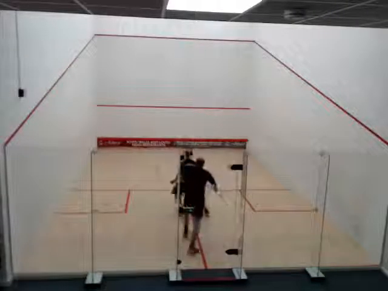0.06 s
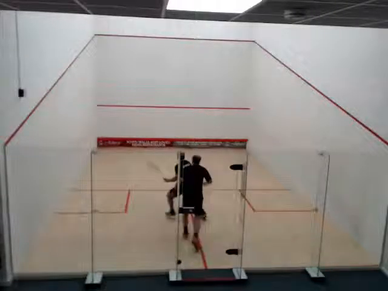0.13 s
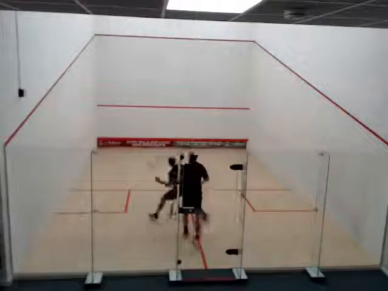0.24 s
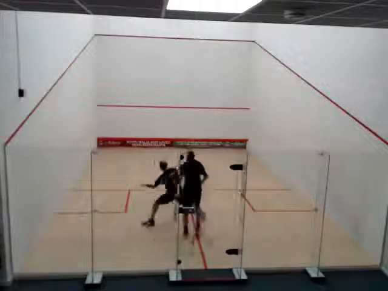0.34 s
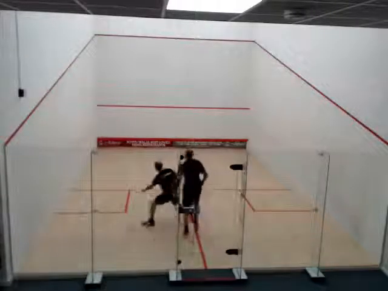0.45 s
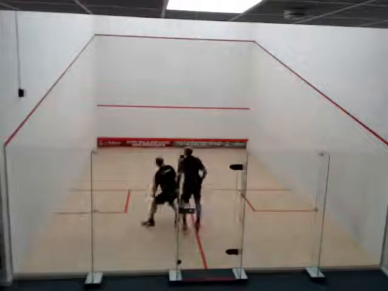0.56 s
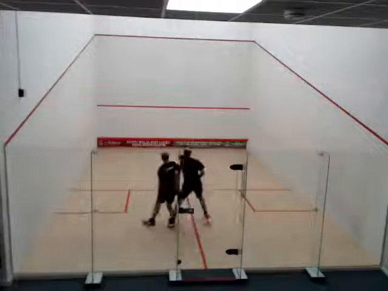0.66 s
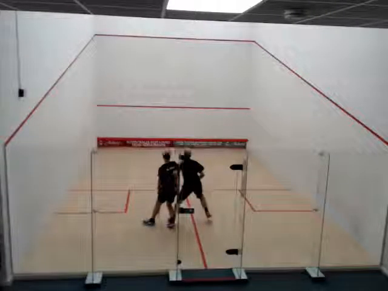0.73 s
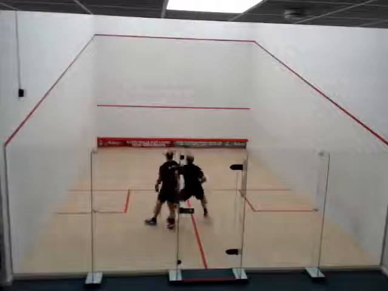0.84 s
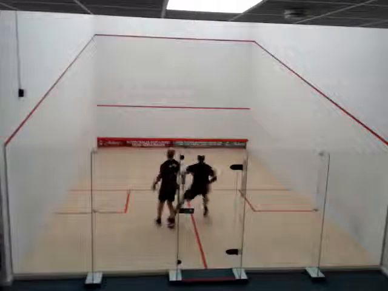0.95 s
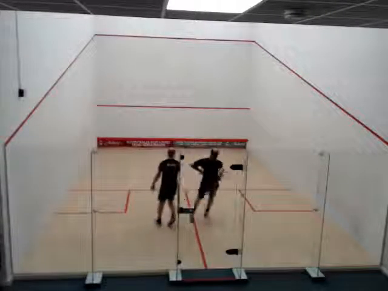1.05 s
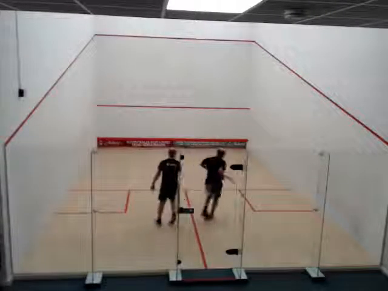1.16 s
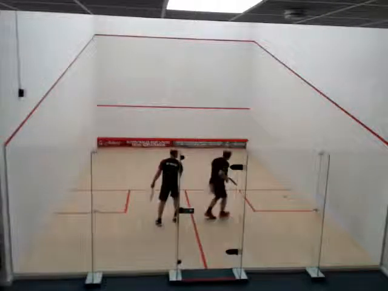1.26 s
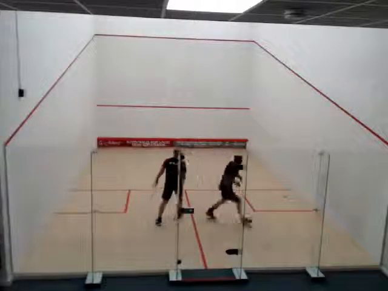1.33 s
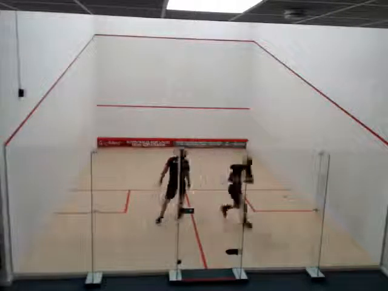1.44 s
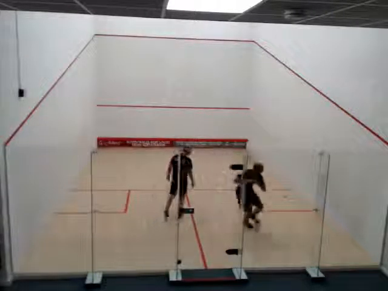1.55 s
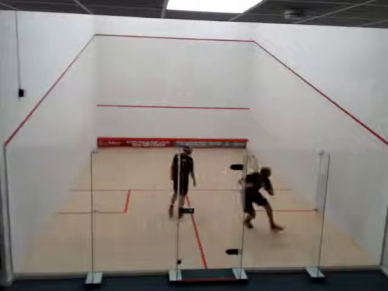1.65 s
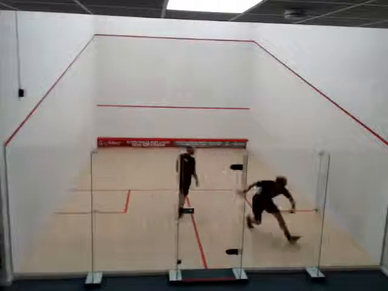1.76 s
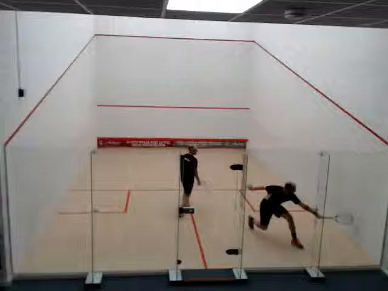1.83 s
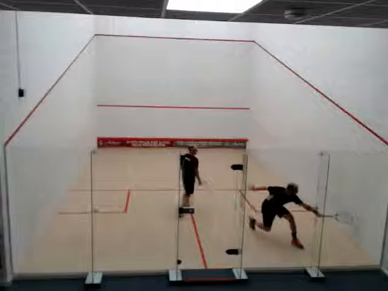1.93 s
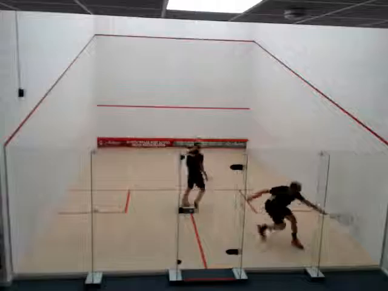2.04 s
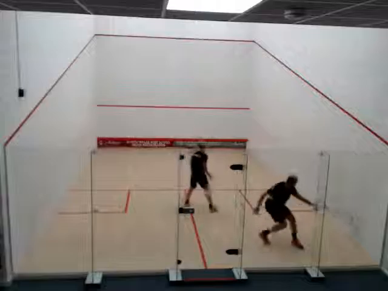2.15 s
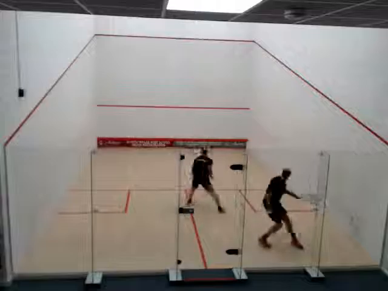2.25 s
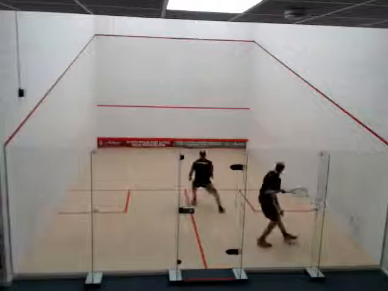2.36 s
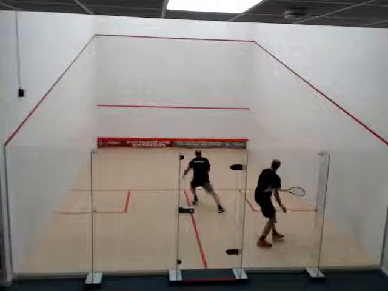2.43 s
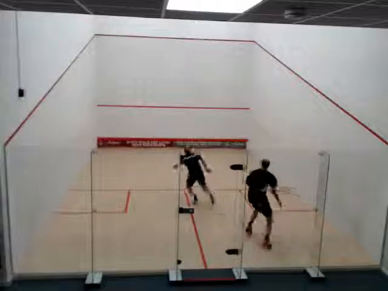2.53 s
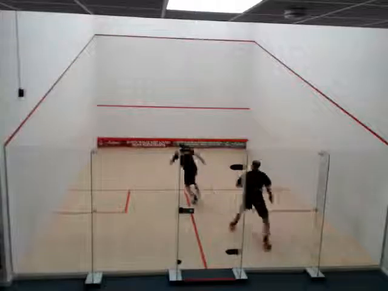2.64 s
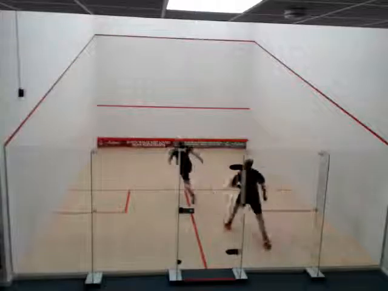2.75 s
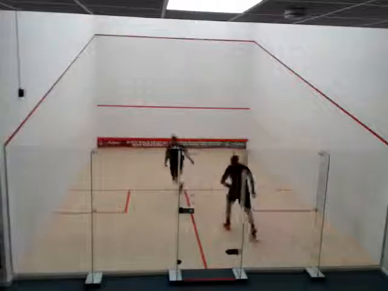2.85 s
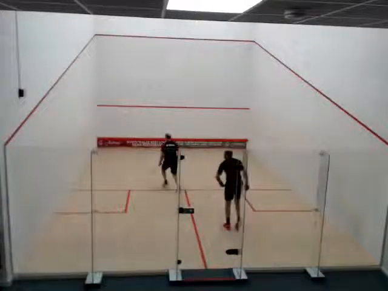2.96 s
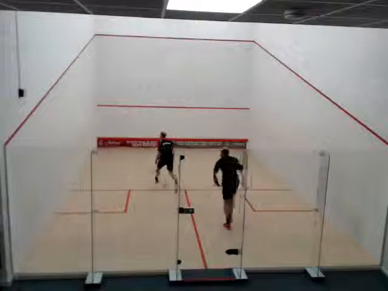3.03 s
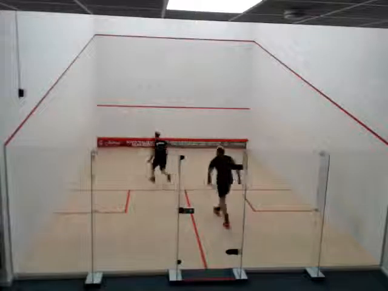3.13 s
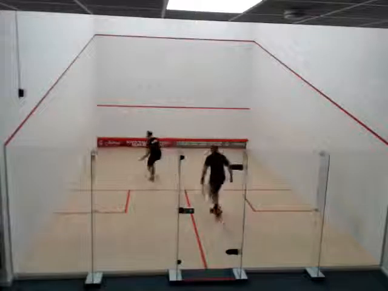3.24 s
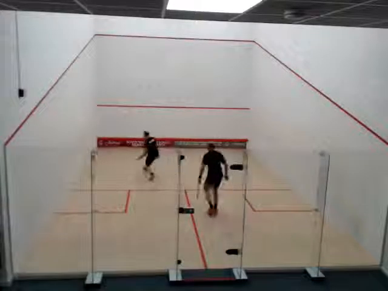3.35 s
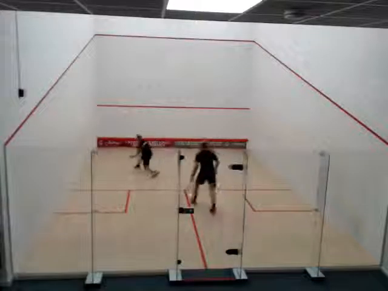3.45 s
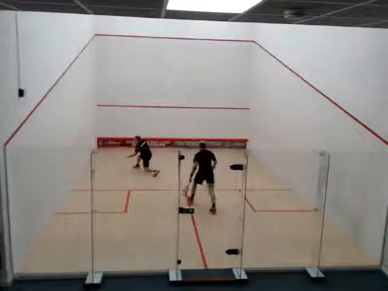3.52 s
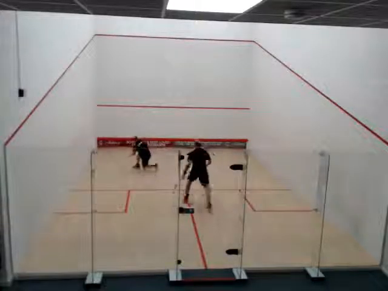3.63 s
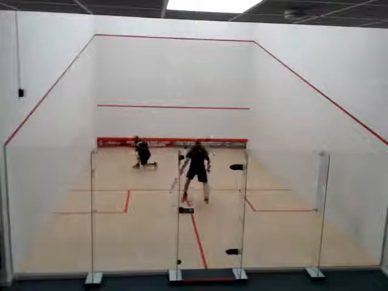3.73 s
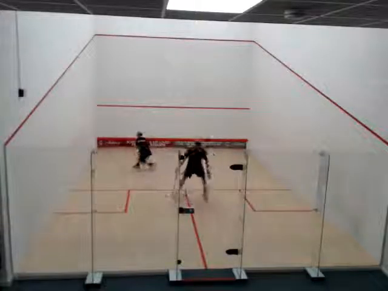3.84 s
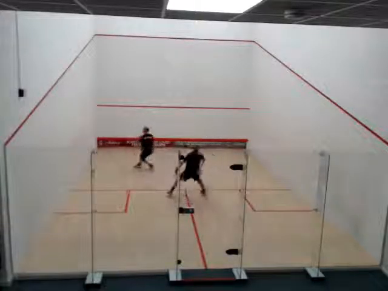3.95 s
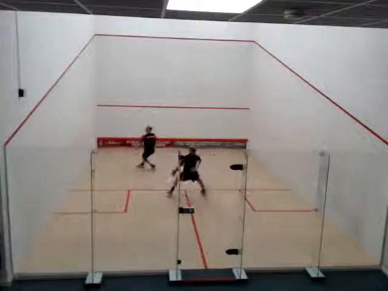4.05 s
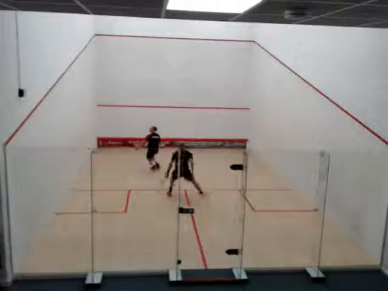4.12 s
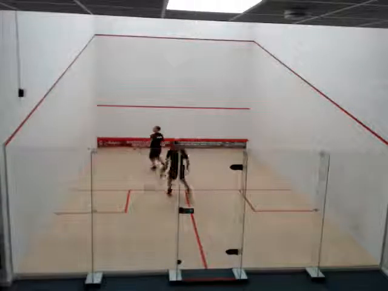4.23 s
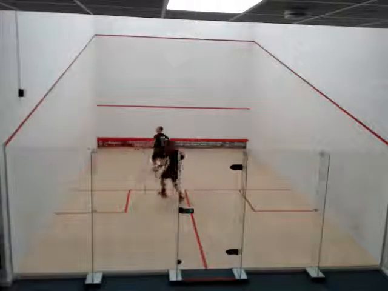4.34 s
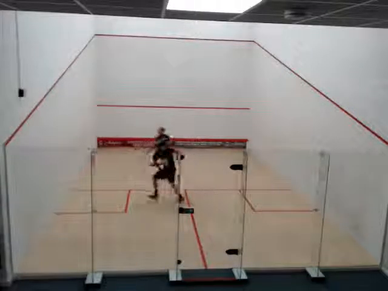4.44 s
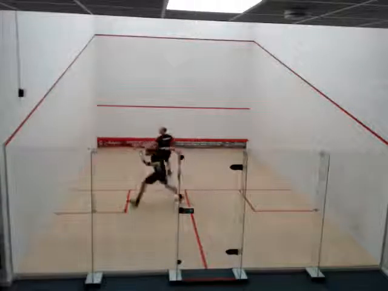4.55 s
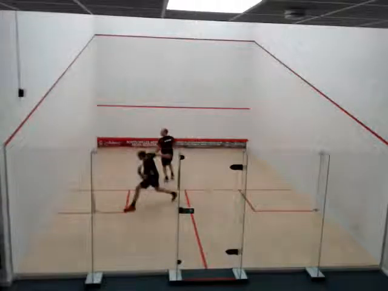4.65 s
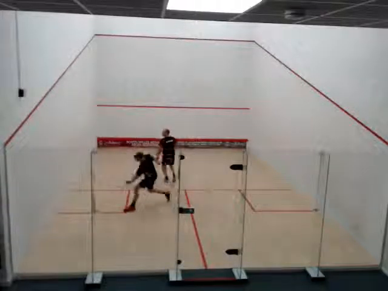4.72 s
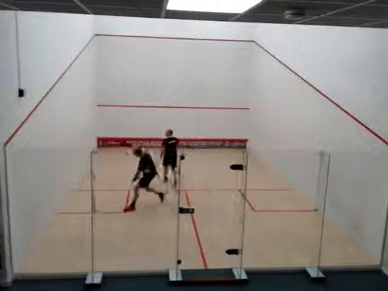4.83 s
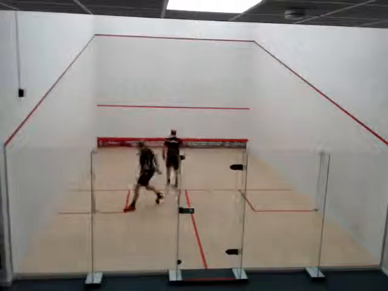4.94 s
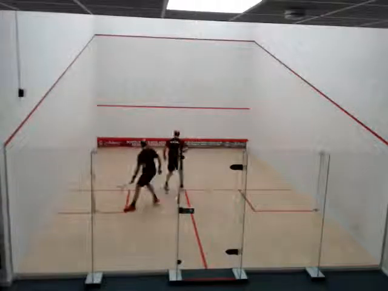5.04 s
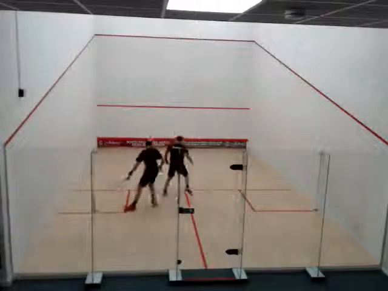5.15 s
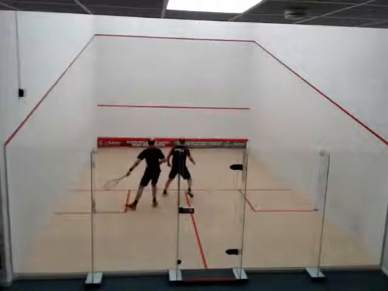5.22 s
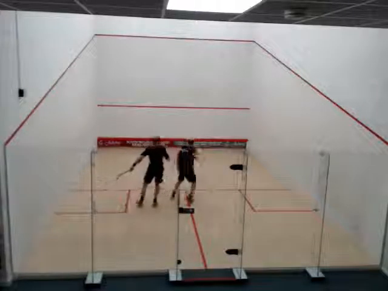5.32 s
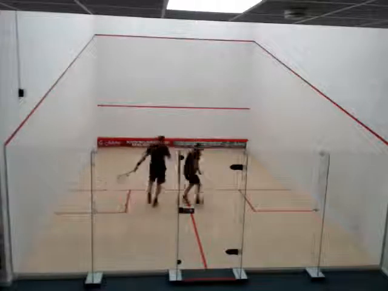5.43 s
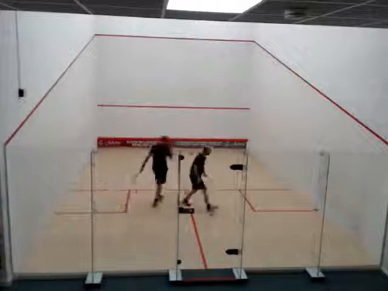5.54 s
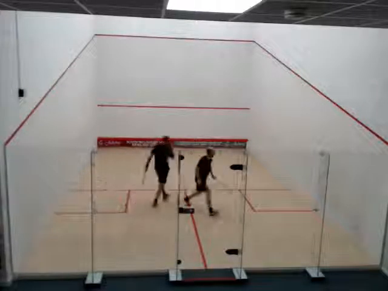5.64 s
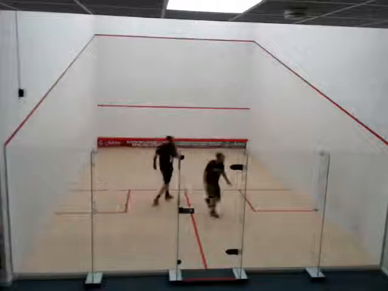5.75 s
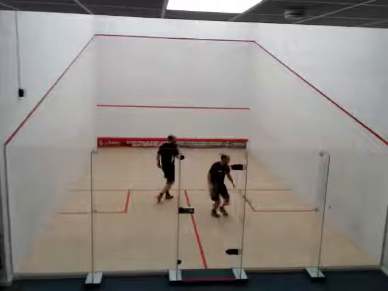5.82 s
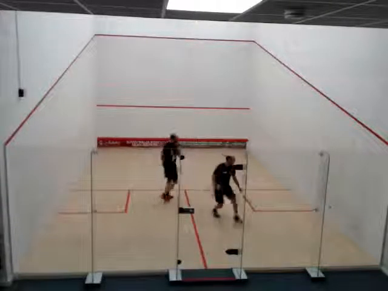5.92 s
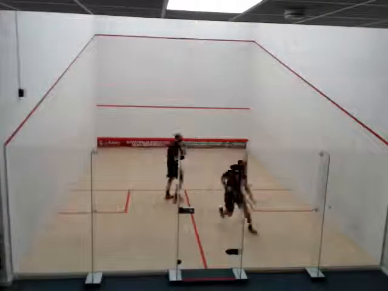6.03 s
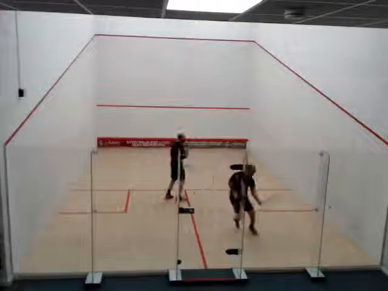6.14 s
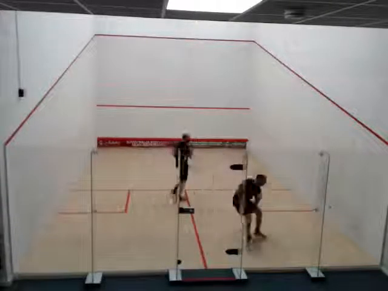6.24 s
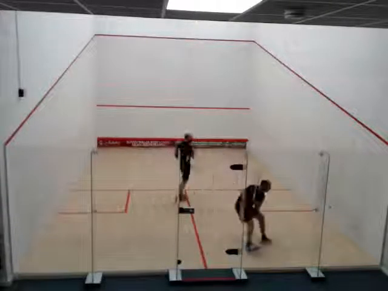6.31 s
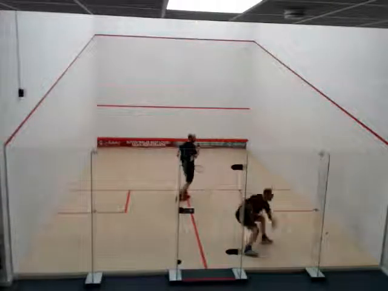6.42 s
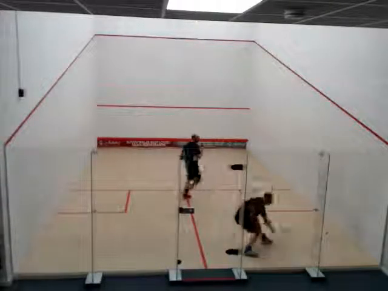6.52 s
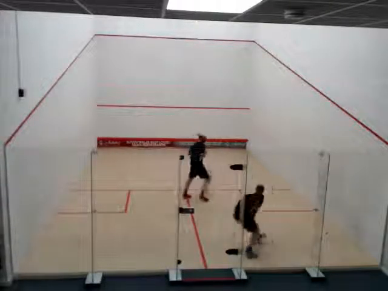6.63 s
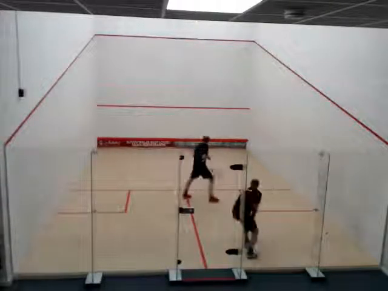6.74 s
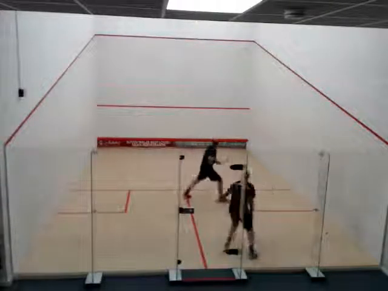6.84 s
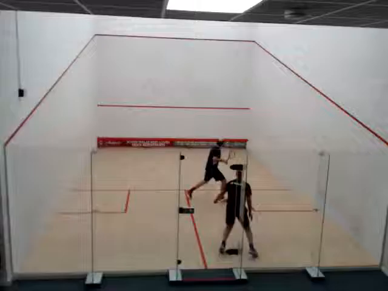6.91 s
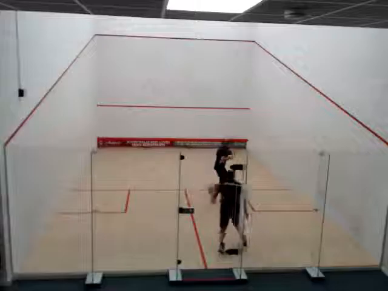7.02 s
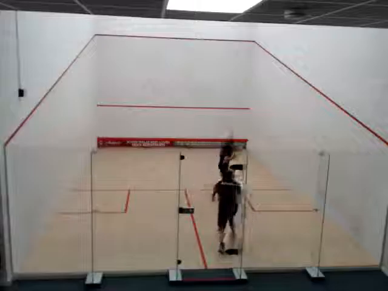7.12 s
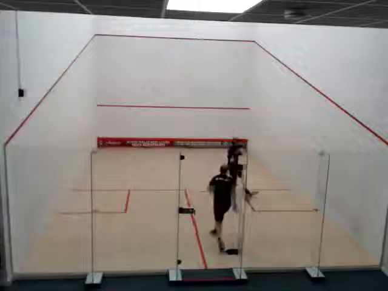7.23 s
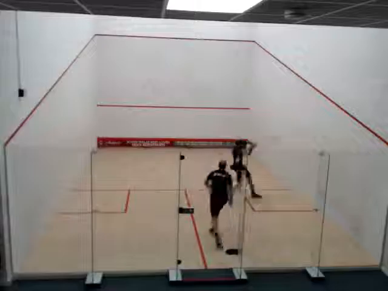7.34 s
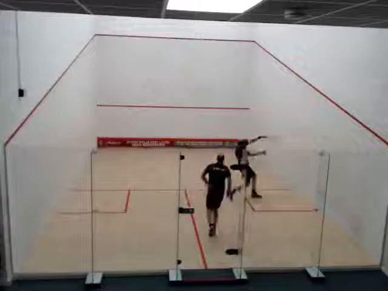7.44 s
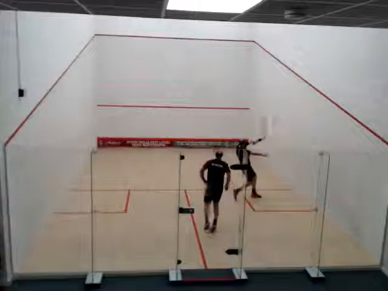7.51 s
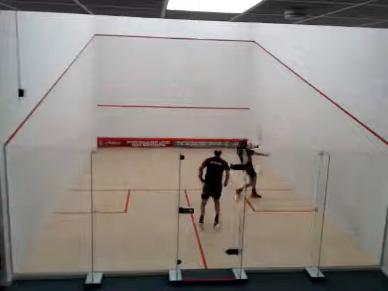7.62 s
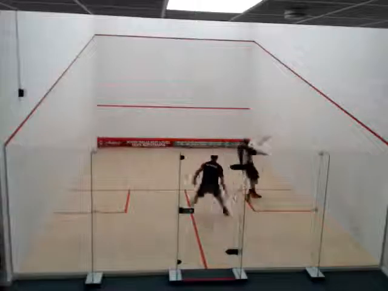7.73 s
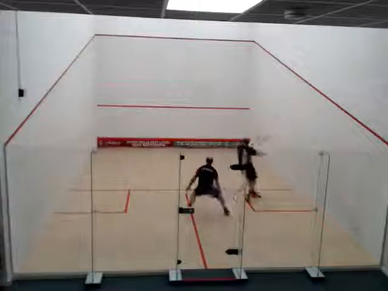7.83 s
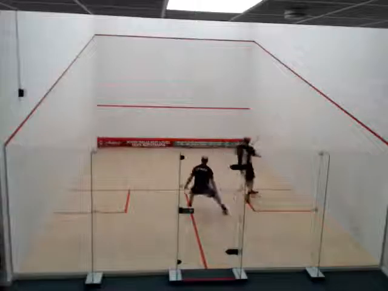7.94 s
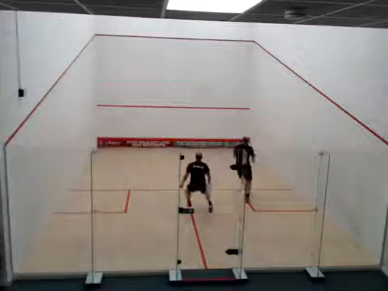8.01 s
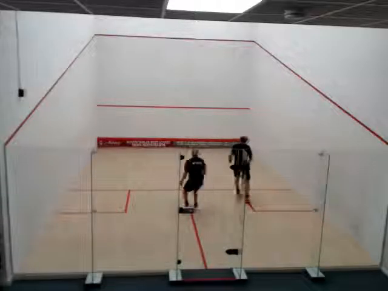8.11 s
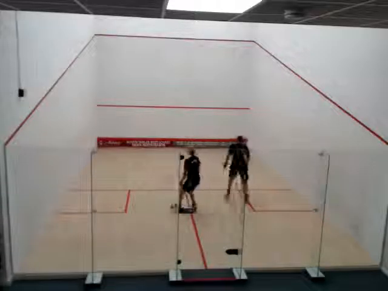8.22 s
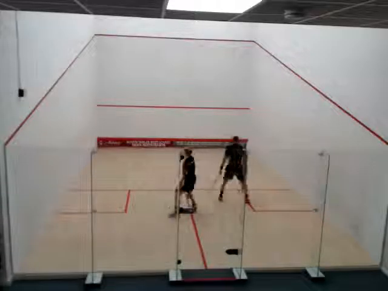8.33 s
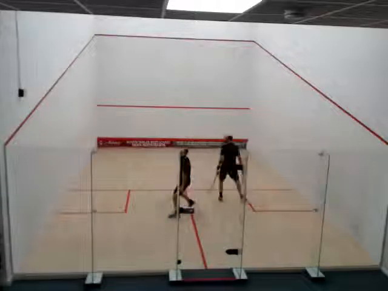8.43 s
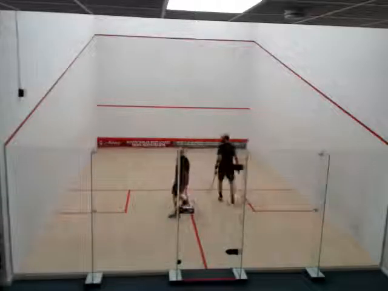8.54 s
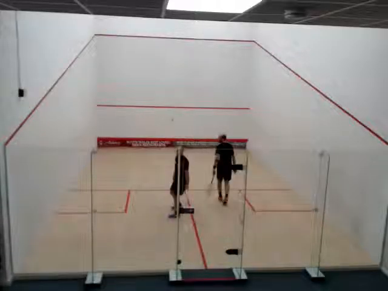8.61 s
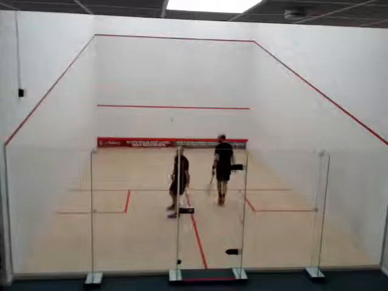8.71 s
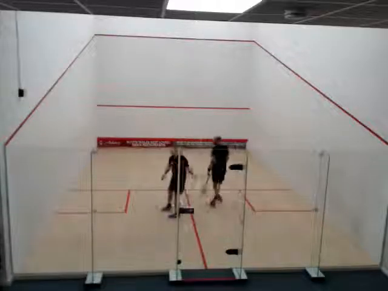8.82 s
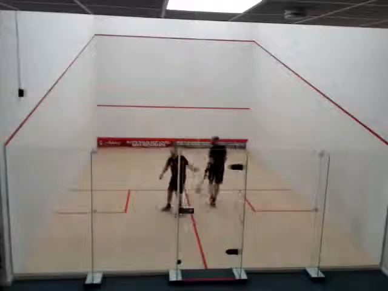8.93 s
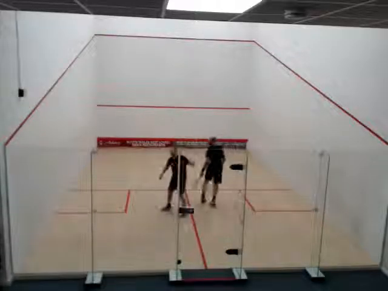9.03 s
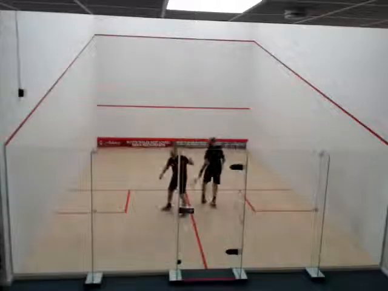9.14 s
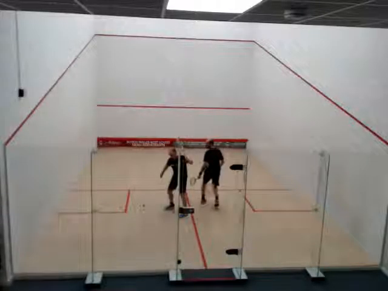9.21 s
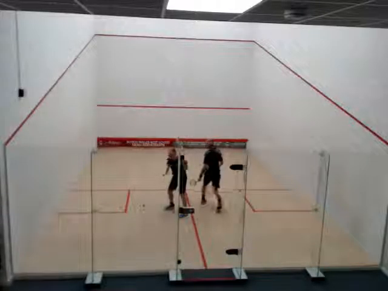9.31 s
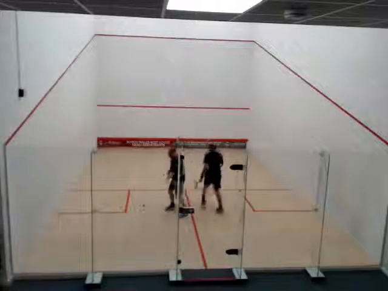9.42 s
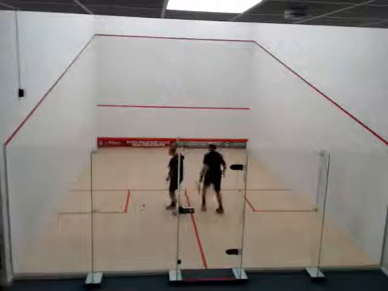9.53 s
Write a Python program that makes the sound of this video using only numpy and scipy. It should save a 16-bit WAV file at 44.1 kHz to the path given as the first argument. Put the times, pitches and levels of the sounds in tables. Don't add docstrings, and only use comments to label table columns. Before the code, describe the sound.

A squash ball cracks hollowly off strings and walls in a bare, ringing court while shoes squeak, scuff and thud on sprung boards.

```python
import sys
import numpy as np
from scipy import signal
from scipy.fft import rfft, irfft, next_fast_len
from scipy.io import wavfile
from scipy.ndimage import uniform_filter1d

SR = 44100
rng = np.random.default_rng(int(sys.argv[2]) if len(sys.argv) > 2 else 0)


def boost_factor(decibels):
    exponent = np.asarray(decibels, float) / 20
    return 10 ** exponent


def master(y):
    cut = np.clip(np.atleast_2d(y).T, -1, 1)
    pcm = np.round(cut * 32767)
    wavfile.write(sys.argv[1], SR, pcm.astype(np.int16))


N = 422037
LEAD = SR // 2


def at_hz(points, hz):
    table_hz, values = np.array(points).T
    return np.interp(np.log(hz + 1e-9), np.log(table_hz), values)


def coloured(x, points):
    size = next_fast_len(len(x))
    gain = boost_factor(at_hz(points, np.fft.rfftfreq(size, 1 / SR)))
    return irfft(rfft(x, size) * gain, size)[:len(x)]


def click(points):
    log_spectrum = np.log(boost_factor(at_hz(points, np.fft.rfftfreq(2048, 1 / SR))))
    cepstrum = irfft(log_spectrum)
    cepstrum[1:1024] *= 2
    cepstrum[1025:] = 0
    return irfft(np.exp(rfft(cepstrum)))[:1024]


def silent_tracks():
    return np.zeros((2, N + LEAD))


def add(tracks, start_s, burst, ring_db):
    i = LEAD + round(start_s * SR)
    part = burst[:tracks.shape[1] - i]
    tracks[:, i:i + len(part)] += part * boost_factor(np.array([[0], [ring_db]]))


# pitch_hz [Hz], density_db [dB per Hz]
AIR = [(35, -52), (60, -30.5), (102, -5.5), (273, -8), (411, -14.5), (536, -8.5), (825, -15), (1490, -10),
       (2290, -23), (8000, -45.5), (10400, -97.5), (17600, -120)]


def building_air():
    air = coloured(rng.standard_normal(N), AIR)
    return boost_factor(-41.5) * air / air.std()


# pitch_hz [Hz], t60_s [s]
COURT_RING = [(80, 0.11), (160, 1.72), (320, 2.1), (600, 3.57), (850, 2.45), (1350, 2.36), (2000, 2.81),
              (2900, 1.63), (4500, 1.64), (7000, 0.69)]
# delay_s [s], level_db [dB]
WALL_ECHOES = [(.003, 3.5), (.011, -5.5), (.019, -5), (.036, -17), (.057, -2.5), (.061, -6), (.078, -1.5),
               (0.115, -3.5), (.15, -6), (.171, -8.5), (0.212, -9.5), (0.258, -15)]


def court(direct, feed):
    t = np.arange(2 * SR) / SR
    noise = rng.standard_normal((2, len(t)))
    lumps = rng.standard_normal((15, len(t)))
    ring = np.zeros(len(t))
    for k, hz in enumerate(60 * 2 ** np.arange(0, 7.4, .5)):
        band = signal.butter(2, [hz / 2 ** .25, hz * 2 ** .25], "band", fs=SR, output="sos")
        clumps_db = 40 * uniform_filter1d(lumps[k], size=500)
        decay_db = -60 * t / at_hz(COURT_RING, hz)
        ring += signal.sosfilt(band, noise[k % 2]) * boost_factor(clumps_db + decay_db)
    swell = 1 - np.exp(-t / 0.0018)
    ring = boost_factor(-23.5) * ring * swell
    for delay_s, level_db in WALL_ECHOES:
        ring[round(delay_s * SR)] += boost_factor(level_db)
    return direct + signal.fftconvolve(feed, ring)[:len(feed)]


def glass(x):
    for lag in (23, 41, 67):
        pole = np.zeros(lag + 1)
        pole[[0, -1]] = 1, .5
        x = signal.lfilter(pole[::-1], pole, x)
    return x


# start_s [s], peak_db [dB], length_s [s], centre_hz [Hz]
BRUSHES = [
    (0.472, -44.5, 0.031, 5000),
    (2.675, -37, .028, 4400),
    (2.729, -48.5, .028, 4200),
    (3.543, -32.5, 0.055, 1500),
    (4.712, -35, 0.035, 3240),
    (7.578, -35, .03, 5080),
    (8.885, -34, 0.028, 5000),
    (8.893, -25, 0.021, 2300),
    (8.933, -51, 0.043, 5200),
    (9.037, -47, 0.022, 3300),
]


def brushes():
    tracks = silent_tracks()
    noises = rng.standard_normal((len(BRUSHES), 3000))
    for (start_s, peak_db, length_s, hz), noise in zip(BRUSHES, noises):
        band = signal.butter(2, [hz / 1.3, hz * 1.3], "band", fs=SR, output="sos")
        along = np.linspace(0, 1, round(length_s * SR))
        puff = np.sin(np.pi * along ** 0.58)
        friction = signal.sosfilt(band, noise)[:len(along)]
        add(tracks, start_s, boost_factor(peak_db) * friction * puff, ring_db=-17)
    return tracks


# start_s [s], peak_db [dB], board_hz [Hz]
STEPS = [(1.247, -35, 139), (1.393, -40, 120), (2.232, -42.5, 122), (3.007, -34, 106), (3.08, -22.5, 138),
         (3.161, -34, 146), (3.211, -33, 118), (3.33, -35.5, 155), (3.405, -35.5, 126), (3.471, -40, 117.5),
         (4.544, -30.5, 102), (5.301, -38.5, 148), (5.615, -29, 107.7), (6.197, -28, 89.5),
         (6.385, -30, 136.5), (6.474, -32.5, 146), (6.935, -37, 205), (7.595, -51, 150.3),
         (8.222, -26.5, 132), (8.413, -25, 139), (8.535, -34.5, 164), (8.753, -23, 117), (8.821, -25, 170),
         (8.92, -29.5, 152.4), (9.06, -33.5, 156.5), (9.299, -33.5, 124)]
# start_s [s], peak_db [dB], board_hz [Hz], ring_db [dB]
LUNGES = [(.378, -21, 97.37, 2.5), (.651, -22, 142.3, -16.5), (1.821, -29.5, 106.3, 16.5),
          (1.849, -22.5, 158.5, 4.5), (3.537, -15, 108.3, -5.5), (3.638, -18.5, 144.6, 8),
          (3.698, -21.5, 188, 8), (4.036, -15.5, 118.3, -3.5), (4.41, -21.5, 110.2, -11.5),
          (4.676, -16, 118, -2.5), (4.76, -18.5, 126.7, -9.5), (4.978, -22.5, 200.3, -1),
          (6.083, -23, 103.8, -5), (6.609, -21.5, 210.4, 2), (7.834, -12.5, 144, -2),
          (7.951, -14.5, 112, -0.5)]


def footfalls():
    tracks = silent_tracks()
    t = np.arange(8000) / SR
    boards = signal.butter(2, [75, 165], "band", fs=SR, output="sos")
    step_ring_db = -1.5
    feet = list(LUNGES) + [(*row, step_ring_db) for row in STEPS]
    noises = rng.standard_normal((len(feet), len(t)))
    for (start_s, peak_db, hz, ring_db), noise in zip(feet, noises):
        push = t / 0.0078 * np.exp(1 - t / 0.0065) * np.sin(2 * np.pi * hz * t)
        rumble = boost_factor(19) * signal.sosfilt(boards, noise * np.exp(-t / 0.049))
        add(tracks, start_s, boost_factor(peak_db - 1.5) * (push + rumble), ring_db - 10)
    return tracks


# start_s [s], peak_db [dB], pitch_hz [Hz], length_s [s], octave_db [dB]
SQUEAKS = [(-.1, -22, 3175, 0.021, -20.5), (1.26, -43.5, 3727, .09, -22), (1.302, -34, 3830, 0.021, -6.5),
           (1.418, -19.5, 2462, 0.012, -7), (1.9, -26, 2084, .017, -4.5), (2.313, -40.5, 5190, 0.013, -27),
           (2.317, -38, 4134, 0.035, -26), (6.356, -38.5, 3700, 0.017, -11),
           (6.411, -17.5, 3714, 0.0044, -11.5), (7.353, -35, 4910, 0.047, -11),
           (7.859, -43, 3880, 0.021, -14), (8.081, -30.5, 3092, 0.013, -10),
           (8.254, -38, 3083, 0.018, -20.5), (9.054, -30, 2896, 0.014, -14.5)]
# start_s [s], peak_db [dB], pitch_hz [Hz], length_s [s]
SCUFFS = [(0.824, -34, 4650, 0.037), (3.559, -27, 2330, 0.023), (3.562, -34, 3540, 0.021),
          (3.565, -36.5, 4690, .019), (3.57, -39, 6020, 0.023), (4.709, -40.5, 3204, 0.016),
          (4.713, -40.5, 1040, .03), (4.755, -36, 1350, 0.032), (6.441, -34, 4114, 0.07),
          (6.419, -40, 3050, .02), (1.413, -30.5, 2935, 0.0091), (1.412, -41.5, 5650, 0.011),
          (9.056, -36, 3260, 0.025), (7.277, -32, 4996, .027), (8.839, -42, 4170, 0.0077),
          (9.069, -40, 3590, 0.051)]


def squeaks():
    tracks = silent_tracks()
    grip_glide = -.03
    skid_octave_db, skid_glide = -19, .16
    soles = [(*row, grip_glide) for row in SQUEAKS]
    soles += [(*row, skid_octave_db, skid_glide) for row in SCUFFS]
    noises = rng.standard_normal((len(soles), 2, 6000))
    for (start_s, peak_db, hz, length_s, octave_db, glide), noise in zip(soles, noises):
        along = np.linspace(0, 1, max(round(length_s * SR), 64))
        waver = uniform_filter1d(noise[0], size=100)[:len(along)]
        pitch_hz = hz * (1 + glide * (along - .5) + .18 * waver)
        phase = 2 * np.pi * np.cumsum(pitch_hz) / SR
        tone = np.sin(phase) + boost_factor(octave_db) * np.sin(2 * phase)
        tone += boost_factor(octave_db - 19.0) * np.sin(3 * phase)
        friction = boost_factor(-16.5) * np.diff(noise[1], prepend=0)[:len(along)]
        swell = np.sin(np.pi * along ** 0.62)
        add(tracks, start_s, boost_factor(peak_db - 7.0) * (tone + friction) * swell, ring_db=-1.35)
    return tracks


# start_s [s], strength_db [dB], hardness_db [dB], hollowness_db [dB]
BLOWS = [(-.22, -1.5, -1, 3.5), (.49, -16, -2.5, -3.5), (.516, -8, 0, -4.5), (.66, -2, 0.5, 5.5),
         (1.295, -29.5, 5.5, -1), (1.855, -14.5, -14.5, -1), (1.883, -16.5, -10, 2), (1.904, -20, 6, -8),
         (3.546, -17, -2, -2.5), (3.741, -1.5, -0.5, 4.5), (4.715, -17.5, -6.5, 1), (4.759, -24.5, 0.5, 1),
         (4.843, -18, -2, -7), (4.871, -9.5, -1, -1), (4.989, 1, 1.5, 3.5), (6.119, -26.5, -7.5, -8.5),
         (6.424, -36, 7, 8), (6.596, -10, -6.5, -0.5), (6.639, -9, 0.5, -4.5), (6.885, -11, 1.5, -3),
         (7.599, -19.5, -16, -8), (7.773, -12.5, 1, -1.5), (8.073, -33, 10.5, -7.5),
         (8.255, -20.5, 0.5, -3.5), (8.886, -34, 6.5, -10.5), (8.954, -32, -18, -3), (9.541, -23, -2, -2)]
# start_s [s], thump_db
# [dB], crack_db [dB]
TICKS = [
    (2.231, -34, -53),
    (2.316, -56, -44),
    (2.68, -66, -46),
    (7.545, -32, -41.5),
    (9.076, -65.5, -45),
    (7.256, -43.5, -65),
    (7.39, -30.5, -67),
    (7.45, -40.5, -73),
    (7.64, -44, -68.5),
]
BALL_BANDS_HZ = [
    800,
    350,
    2200,
    6000,
]


def ball():
    tracks = silent_tracks()
    contacts = []
    for start_s, body_db, hard_db, hollow_db in BLOWS:
        thump_db = -22.5 + 0.73 * body_db
        slap_db = body_db - 18.5 + hard_db
        crack_db = body_db - 25.5 + 1.06 * hard_db
        ring_db = -1.02 - 0.0233 * body_db
        contacts.append((start_s, body_db, thump_db, slap_db, crack_db, ring_db, hollow_db))
    for start_s, thump_db, crack_db in TICKS:
        contacts.append((start_s, -47.5, thump_db, crack_db + 4.5, crack_db, -5, 0))
    gap_hz = 1350
    for start_s, *levels_db, ring_db, hollow_db in contacts:
        pulse_db = np.add(levels_db, [24.53, 40.55, 32.87, 27.45])
        colour = sorted(zip(BALL_BANDS_HZ, pulse_db))
        gap_db = at_hz(colour, gap_hz) - hollow_db
        colour = sorted(colour + [(gap_hz, gap_db)])
        low_end = (120, colour[0][1] - 15)
        add(tracks, start_s, click([low_end] + colour), ring_db)
    return tracks


def scene():
    lead_in = round(.0025 * SR)
    direct, feed = brushes() + footfalls() + squeaks() + ball()
    inside = court(direct, feed)
    heard = glass(np.pad(inside, (0, lead_in)))[LEAD + lead_in:]
    return (heard + building_air())[None]


def squeeze(x, knee_db, share, release_db_s):
    level_db = 10 * np.log10(uniform_filter1d(x ** 2, size=256) + 1e-12)
    over_db = np.maximum(level_db - knee_db, 0)
    creep_db = release_db_s * np.arange(N) / SR
    held_db = np.maximum.accumulate(over_db + creep_db) - creep_db
    return x * boost_factor(-np.clip(share, 0, .9) * uniform_filter1d(held_db, size=128))


# pitch_hz [Hz], gain_db [dB]
MICROPHONE = [(28, -13), (55, -13), (100, 0), (250, -1), (750, 2), (1100, 0), (1500, -8), (2150, 1),
              (3000, -2), (7200, -3), (8000, -11), (8500, -28), (8800, -60), (9300, -95)]


def microphone(x):
    return coloured(x, MICROPHONE)


def suppress(x, memory_s, margin_db, soft_db, depth_db, start_db, react_s, close_s):
    hop = 128
    hz, _, frames = signal.stft(x, SR, nperseg=1024, noverlap=1024 - hop)
    bark = 26.81 * hz / (1960 + hz) - .53
    band = np.maximum(bark, 0).astype(int)
    member = band == np.arange(band.max() + 1)[:, None]
    quick, slow, fade = np.exp(-hop / SR / np.array([react_s, memory_s, close_s]))
    power = member @ np.abs(frames) ** 2
    power = signal.lfilter([1 - quick], [1, -quick], power, zi=quick * power[:, 4:5])[0]
    level = 10 * np.log10(power + 1e-14)
    noise_start = slow * (level[:, 4:5] + start_db)
    noise = signal.lfilter([1 - slow], [1, -slow], level, zi=noise_start)[0]
    shut = .5 - .5 * np.tanh((level - noise - margin_db) / soft_db)
    closing = signal.lfilter([1 - fade], [1, -fade], shut)
    shut = np.minimum(shut, closing)
    gain = uniform_filter1d(boost_factor(-depth_db * shut)[band], size=5, axis=0)
    return signal.istft(frames * gain, SR, nperseg=1024, noverlap=1024 - hop)[1][:N]


SLIPS = [-42, -54, -55, -62, -64, -73, -80, -53, -29, -39, -52, -34, -48, -80, -45, -61, -65, -80, -51, -74,
         -42, -58]


def buffer_slips():
    ticks = np.zeros(N + 400)
    first_s, block, blocks_per_slip = .345, 2048, 9.415
    for k, peak_db in enumerate(SLIPS):
        i = round(first_s * SR) + block * int(k * blocks_per_slip + .6)
        ticks[[i, i + 193]] = boost_factor(peak_db + 11.5) * np.array([-1, 1])
    return ticks[:N]


def roll_off(x):
    return signal.sosfilt(signal.butter(12, 17180, fs=SR, output="sos"), x)


def record(dry):
    x = squeeze(dry[0], knee_db=-15.0, share=0.27, release_db_s=31.5)
    x = microphone(x)
    x = suppress(x, memory_s=0.77, margin_db=1.0, soft_db=2, depth_db=15,
                 start_db=-15.5, react_s=.015, close_s=.02)
    x = x / (1 + (x / .8) ** 4) ** .25
    mix = (x + buffer_slips())[None]
    return roll_off(mix)


dry = scene()
out = record(dry)
master(out)
```